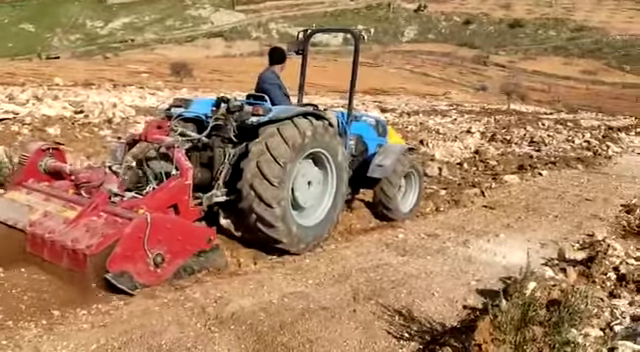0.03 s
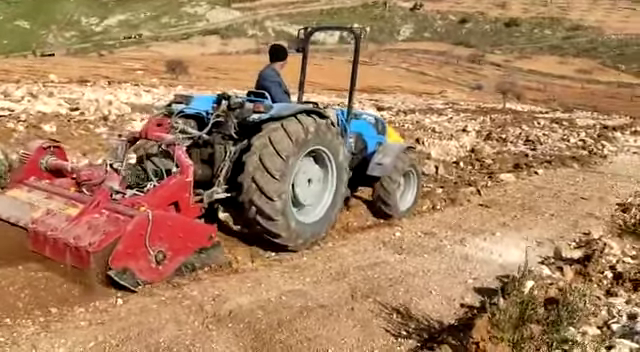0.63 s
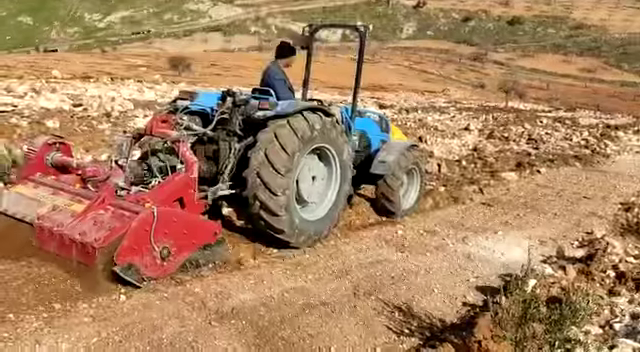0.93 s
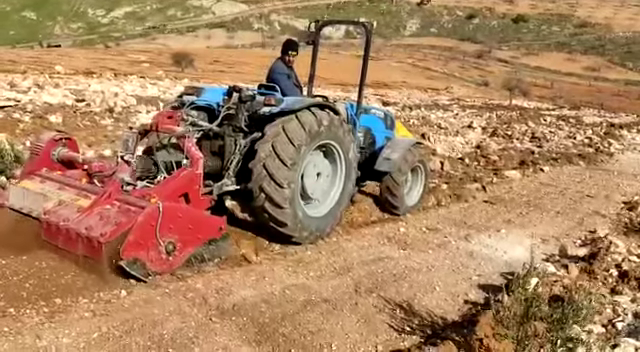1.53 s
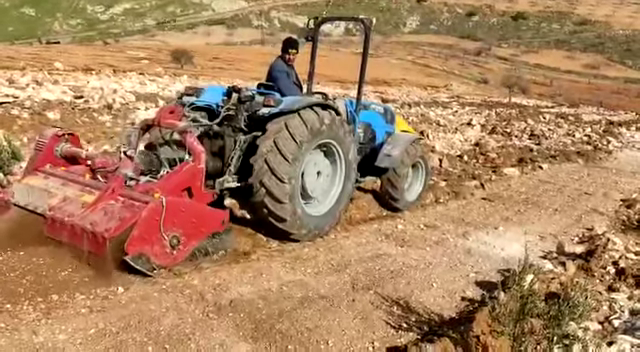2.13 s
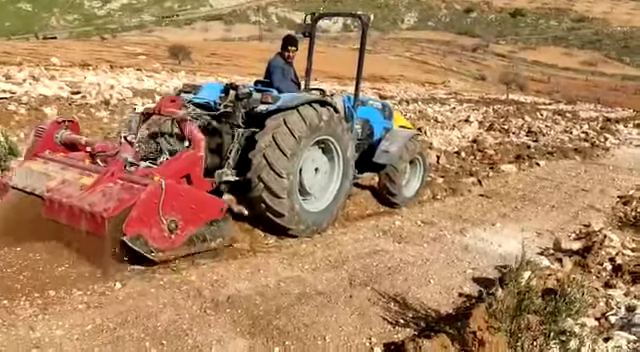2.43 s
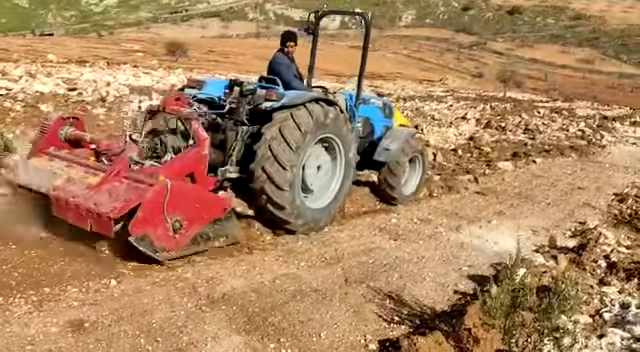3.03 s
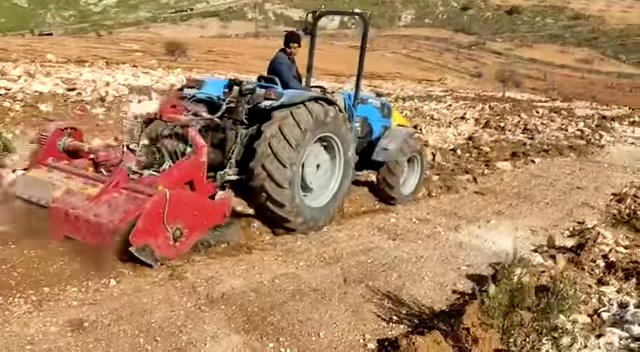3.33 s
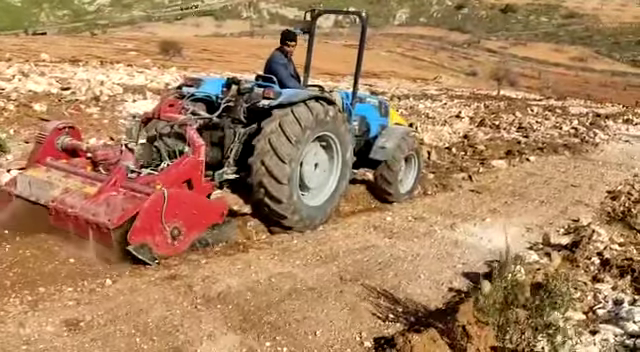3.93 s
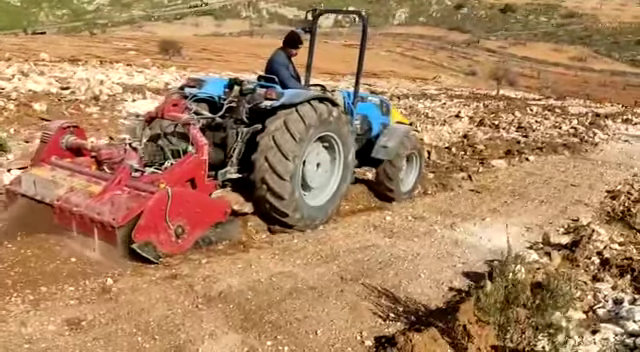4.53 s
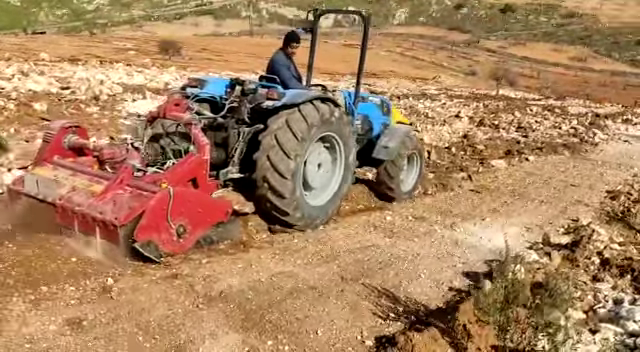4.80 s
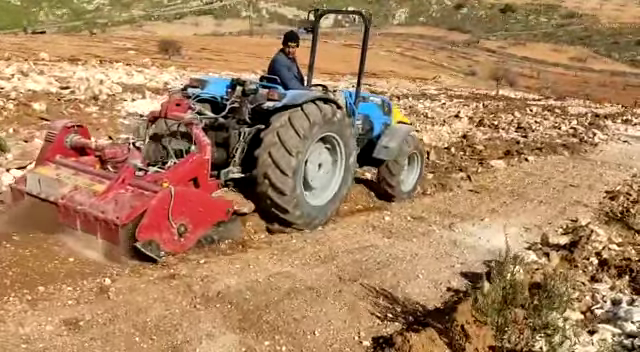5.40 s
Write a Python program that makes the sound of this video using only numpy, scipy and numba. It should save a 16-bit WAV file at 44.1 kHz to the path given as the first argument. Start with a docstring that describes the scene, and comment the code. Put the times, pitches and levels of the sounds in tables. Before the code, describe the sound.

A diesel tractor works a stone crusher outdoors, a few metres from the microphone. From the start, rapid hammering makes a steel hood boom and clatter over the engine's throb, with throaty scraping, a hiss of grit and scattered sharp cracks. Big stones bang repeatedly until they break. Between about 1 and 2 seconds the pounding settles into an even, pulsing drone.

At about 2.2 seconds the crusher lifts: the grinding thins, a few stones still snap, and the engine rises slightly in pitch. The lull is deepest just before 3 seconds. At about 3.1 seconds the crushing returns abruptly with bangs and thuds. The engine sags, lowest around 3.4 seconds, and recovers by 4. From there until the end, near 5.7 seconds, looser stones tumble and rattle irregularly, with low thumps, bright cracks and spraying grit over the steady engine.

```python
"""A diesel tractor drags a stone crusher over a stony field, a few metres away.
At first it feeds steadily: four rows of hammers pound stones against a steel hood, whose modes boom and
clatter while grit sprays inside; big stones are hit once a turn until they break. Soon after 2 s the
crusher is lifted, the load falls and the engine runs free. Just after 3 s it drops back; the engine
sags, recovers by about 4 s and works on through looser stones."""
import sys
import numpy as np
from scipy import signal
from scipy.fft import rfft, irfft, next_fast_len
from scipy.io import wavfile
from scipy.ndimage import uniform_filter1d
from numba import njit

SR = 44100
rng = np.random.default_rng(int(sys.argv[2]) if len(sys.argv) > 2 else 0)


def output_pcm(signal):
    """Save a mono or channel-first signal as 16-bit PCM at the path in sys.argv[1].

    Samples are clipped to [-1, 1] before scaling.
    """
    pcm = np.clip(np.atleast_2d(signal).T, -1, 1) * 32767
    wavfile.write(sys.argv[1], SR, np.round(pcm).astype(np.int16))


N = 249606
TIME = np.arange(N) / SR

# Levels in the tables are relative; each layer has its own further gain.
# load on the rotor against steady work: t/s, level/dB
ROTOR_LOAD = [(0, 1), (.185, -5), (.205, 1), (.6, -2.5), (.74, 5), (1.0, -1.5), (1.3, 2.5), (2.15, -1),
              (2.22, -7.5), (2.55, -6), (2.93, -18.5), (3.06, -12), (3.075, 0), (3.19, 1.5), (3.32, -8.5),
              (3.5, 2), (3.66, -3), (3.82, 1.5), (4.25, 0.5), (5.3, -1), (5.66, 1)]
# stone bed: t/s, evenness (share of the boom that repeats every turn), cavity resonance f/Hz
STONE_BED = [(0, 0.45, 934), (1.0, 0.88, 966), (2.05, 0.91, 968), (2.4, 0.18, 957), (3.15, 0.15, 970),
             (3.6, 0.23, 1045), (4.4, 0, 993), (5.66, 0, 1030)]
# hammer rows: angle/turns, boom level/dB, knock level/dB, grit level/dB
HAMMER_ROWS = [(.18, 0, -.5, -.5), (.37, -1.5, -1.5, .5), (.605, 1, -1, 0), (.86, 0, 2, 0)]
# uneven bite of the rotor: t/s, modulation depth (0-1)
BITE_DEPTH = [(0, .28), (.95, .35), (1.2, .1), (1.65, .12), (1.8, .42), (2.15, .42), (2.4, .05),
              (5.66, .05)]
# big stones: first blow t/s, stay in the rotor t/s, bang level/dB, thud level/dB, chip level/dB
BIG_STONE_HITS = [(.196, .03, -6.5, -11, -19), (.257, .25, -13, -18, -26), (.277, .33, -9.5, -15, -24),
                  (.704, .18, -12, -17, -24), (1.061, .03, -12, -15, -21), (1.132, .54, -11.5, -18, -12.5),
                  (1.624, .03, -11, -10, -17), (1.764, .4, -13, -9, -18), (2.365, .03, -10, -7.5, -17),
                  (2.745, .03, -16, -17, -21), (3.068, .11, -12, -9, -16), (3.169, .03, -16, -6, -18),
                  (3.36, .03, -10, -13, -18), (3.401, .11, -14, -26, -20), (3.485, .03, -13, -7, -20),
                  (3.776, .03, -20, -4, -23), (3.809, .03, -17, -4.5, -20), (3.935, .03, -16, -4, -19),
                  (4.3, .11, -15, -8, -18), (4.452, .03, -24, -8, -26), (4.592, .03, -22, -8, -26),
                  (4.607, .47, -16.5, -18, -16), (4.805, .03, -22, -9, -26), (5.13, .03, -21, -5, -22),
                  (5.278, .03, -21, -7, -22), (5.351, .03, -26, -1.5, -26), (5.475, .03, -15, -22, -21),
                  (5.55, .11, -24, -7, -24)]
# rotor harmonics that drone in the hood: multiple of the turning rate, level/dB
ROTOR_ORDERS = [(8, -4.5), (10, -28), (11, -0.5), (13, -15), (14, -5.5), (15, 5), (16, -19), (17, -21),
                (18, 0.5), (19, -3)]
# low panel modes of the hood: f/Hz, bandwidth/Hz, level/dB
PANEL_MODES = [(106, 86, -11.5), (163.9, 13, 1), (205.6, 35.7, -1), (256, 54.6, -1.5), (316, 73, -9)]
# upper modes of the hood: f/Hz, bandwidth/Hz, level/dB
CLATTER_MODES = [(310, 210, -6.5), (474, 94, 0.5), (559, 47.5, 6.5), (785, 217, -1.5), (781, 36, 0),
                 (1230, 173, -0.5), (2255, 38, -1)]
# modes of the scraped hood wall: f/Hz, bandwidth/Hz, level/dB
WALL_MODES = [(420, 104, -4), (596, 160, 1), (807, 170, -2)]
# spectrum of breaking stone: f/Hz, level/dB
STONE_SPECTRUM = [(500, -4), (1000, -10), (1500, 2.5), (2100, 6.5), (2600, -6), (3800, -4), (5200, -6),
                  (6400, -8.5), (7400, -4), (8300, -5.5), (9100, -11), (10000, -29.5), (13000, -29),
                  (15000, -57)]
# grit spray below and above its crossover: t/s, coarse level/dB, fine level/dB
SPRAY_LEVELS = [(0, 1.5, 0), (.6, -0.5, -1), (.9, 0, -1.5), (1.5, 0.5, 1), (2.1, 1, 0.5), (2.5, -3.5, 1),
                (2.95, -1, 1.5), (3.15, 0.5, 1), (3.85, -2.5, 0), (4.15, -3.5, -0.5), (4.5, -3, -2),
                (4.9, -0.5, 2.5), (5.2, -2.5, 0.5), (5.66, -2, .5)]
# stones that split: t/s, level/dB, ring f/Hz, decay t/s
SPLITS = [(.087, -13, 7000, .005), (.104, -12, 7200, .004), (.884, -11, 3700, .007),
          (1.028, -10, 3700, .006), (1.169, -10, 3900, .005), (1.564, -9, 3900, .004),
          (1.834, -11, 3000, .007), (2.128, -7, 7400, .006), (2.151, -6.5, 3170, .004),
          (2.269, -13, 6400, .018), (2.366, -13.5, 2900, .025), (2.442, -9, 6900, .006),
          (2.61, -2.5, 3900, .0022), (2.744, -14, 3100, .005), (3.067, -12, 3400, .014),
          (3.276, -8.5, 6300, .014), (3.277, -10, 2700, .012), (3.459, -10, 2820, .003),
          (3.501, -8, 3600, .003), (3.517, -6, 2260, .004), (3.575, -10, 7000, .004),
          (3.881, -11, 7300, .005), (4.362, -9, 7300, .005), (4.444, -7, 2300, .013),
          (4.579, -8, 2400, .007), (4.654, -9, 4200, .022), (4.873, -9, 7300, .008),
          (5.314, -6.5, 6550, .004), (5.534, -7, 7440, .003)]
# firing rate of the engine: t/s, f/Hz
FIRING_RATE = [(0.0, 43.9), (0.5, 44.55), (1.0, 44.45), (1.5, 44.28), (2.05, 42.82), (2.4, 43.9),
               (2.85, 47.27), (3.1, 45.9), (3.4, 37.91), (3.8, 42.66), (4.3, 43.48), (5.0, 43.23),
               (5.66, 44.14)]
# exhaust note: t/s, fundamental level/dB, octave level/dB
EXHAUST_LEVELS = [(0.0, -39, -37), (0.05, -40, -43), (0.96, -38, -35), (0.99, -41, -54), (1.26, -36, -27),
                  (1.89, -36, -34), (2.46, -26.5, -26), (2.93, -32, -42), (3.29, -51, -38),
                  (3.8, -23, -26.5), (4.13, -39, -39), (5.66, -28, -28)]
# ground scatter against the direct sound: f/Hz, level/dB
GROUND_SPECTRUM = [(50, -3.5), (300, -10), (600, -17), (1600, -7), (2100, -6), (2800, -1), (4200, 0.5),
                   (6000, 3.5), (14000, 0.5)]
# microphone ports, left minus right: f/Hz, level/dB
PORT_BALANCE = [(60, 5), (230, 4.5), (360, 11.5), (480, 0), (750, 3), (1100, 2.5), (1500, -1), (2100, -1),
                (2500, -13), (3300, -1), (3900, -2), (5500, -1.5), (7200, -12.5), (8600, -1)]

# load laws: level/dB at steady load, slope/(dB per dB of load), level/dB added on an even bed
BOOM_LAW, CLATTER_LAW = (-23.5, 0.81, 2.5), (-23, 1.09, -0.35)
GRIND_LAW, GRIT_LAW = (-34.5, 1.0, 6.9), (-24, 0.76, -5)
FIRINGS_PER_TURN, BITE_TURNS = 3.1685, .85
KNOCK_DB, FRAGMENT_DB = 15.3, -9.5  # against a big stone's bang level
SPRAY_CROSSOVER_HZ, PORT_LAG_S, TOP_HZ = 5300, .00027, 14800


def hood_boom(turns, big):
    """Forced vibration: periodic blows on an even bed make the panels drone; loose stones break the beat."""
    boom_db = work_db(BOOM_LAW)
    evenness = curves(STONE_BED)[0]
    blow_s, _, thud_db, _ = big
    blows = hammer_blows(turns, "boom", scatter_db=0, slip_turns=.00053)
    drone = sum(undb(db + wander(3)) * np.sin(2 * np.pi * (order * turns + rng.random()))
                for order, db in ROTOR_ORDERS)
    beat = unit(unit(drone) + undb(-2.5) * unit(ring(blows, PANEL_MODES)))
    # the beat swells after every blow on a big stone
    pound = uniform_filter1d(fade(impulses(blow_s, np.ones(len(blow_s))), decay_s=.025), size=600)
    beat *= (.87 + .15 * pound) * chug(turns)
    loose = grains(per_s=2000, spread_db=2) * (unit(fade(blows, decay_s=.087)) + .97)
    tumble = undb(-1.3) * unit(ring(loose, PANEL_MODES))
    boom = (np.sqrt(evenness) * beat + np.sqrt(1 - evenness) * tumble) * undb(boom_db)
    # a heavy stone dents the hood for a moment, then leaves the panels ringing
    knocks = impulses(blow_s, undb(thud_db))
    dents = rng.standard_normal(N) * fade(knocks, decay_s=.018)
    thuds = undb(37.5) * ring(knocks, PANEL_MODES) + undb(.5) * ring(dents, [(295, 320, 0)])
    jolts = grains(per_s=550, spread_db=2)
    rumble = unit(colour(jolts, [(20, -14), (35, 10), (65, 19), (130, 12), (250, -29)]))
    return boom + thuds + rumble * undb(boom_db - 12.5) * (1.3 - evenness)


def hood_clatter(turns, big):
    """Impact excitation: hammer knocks, rattling stones and big bangs ring the hood's upper modes."""
    gain = undb(work_db(CLATTER_LAW))
    evenness, cavity_hz = curves(STONE_BED)
    knock_share = np.interp(evenness, [0, 1], [.12, .68])
    blow_s, bang_db, _, _ = big
    blows = hammer_blows(turns, "knock", scatter_db=.9, slip_turns=.004)
    loose = grains(per_s=7000, spread_db=.6) * unit(unit(fade(blows, decay_s=.009)) + .35)
    knocks = unit(delayed(blows, lag_s=.000983))
    rattle = (np.sqrt(knock_share) * knocks + np.sqrt(1 - knock_share) * loose * chug(turns)) * gain
    bangs = impulses(blow_s, undb(bang_db))
    fragments = grains(per_s=10000, spread_db=.5) * fade(bangs, decay_s=.033)
    rattle += undb(KNOCK_DB) * bangs + undb(FRAGMENT_DB) * fragments
    # the cavity between hood and ground rings a little higher as the rotor digs in
    cavity = undb(6.5) * resonator(rattle, cavity_hz, width_hz=94.0)
    # loose stones ring a lightly damped plate of the housing
    plate = ring(loose * gain * (1 - .34 * evenness), [(1080.6, 23.6, 8)])
    steel = ring(rattle, CLATTER_MODES) - cavity - plate
    spectrum = [(100, -12), (300, -4.5), (1250, 1), (1600, -49), (2200, -2.5), (3000, -10.5), (9000, -29)]
    return undb(13.5) * colour(steel, spectrum)


def hood_grind(turns):
    """Friction: each hammer row drags stones along the hood wall in a short, throaty scrape."""
    blows = hammer_blows(turns, "knock", scatter_db=1.5, slip_turns=.002)
    drag = unit(fade(blows, decay_s=.006))
    scrape = grains(per_s=12000, spread_db=.5) * (drag + .35) * chug(turns)
    wall = colour(ring(scrape, WALL_MODES), [(200, -20), (380, 0), (950, 0), (1500, -30)])
    return unit(wall) * undb(work_db(GRIND_LAW))


def grit_spray(turns, big):
    """Shot noise: tiny impacts merge into a hiss that surges at each row; big stones shed bright chips."""
    blow_s, _, _, chip_db = big
    coarse_db, fine_db = curves(SPRAY_LEVELS)
    blows = hammer_blows(turns, "grit", scatter_db=1.2, slip_turns=.008)
    surge = unit(fade(blows, decay_s=.007))
    grit = grains(per_s=40000, spread_db=.1) * unit(surge + 2.1) * undb(work_db(GRIT_LAW) + 2)
    chip_bursts = fade(impulses(blow_s, undb(chip_db - 6)), decay_s=.009)
    chips = grains(per_s=25000, spread_db=.5) * chip_bursts
    coarse = grit * undb(coarse_db) + chips
    fine = grit * undb(fine_db) + chips * undb(2)
    lowpass = signal.butter(4, SPRAY_CROSSOVER_HZ, fs=SR, output="sos")
    return undb(5.5) * colour(fine + signal.sosfiltfilt(lowpass, coarse - fine), STONE_SPECTRUM)


def cracks():
    """Brittle fracture: a stone splits with a bright snap and a crunch that rings at its own pitch."""
    crunch, bursts = grains(per_s=25000, spread_db=.5), np.zeros(N)
    for start_s, level_db, hz, decay_s in SPLITS:
        start = int(start_s * SR)
        span = np.arange(start, min(start + 4096, N))
        burst = undb(level_db) * crunch[span] * np.exp(-TIME[:len(span)] / decay_s)
        ringing = resonator(burst, np.full(len(span), float(hz)), width_hz=.16 * hz)
        bursts[span] += burst + undb(5.5) * ringing
    times, levels_db, _, _ = np.transpose(SPLITS)
    snaps = crunch * fade(impulses(times, undb(levels_db - 25)), decay_s=.004)
    snaps = colour(snaps, [(500, -20), (3000, 0), (9000, -1), (14000, -13)])
    return undb(-4) * colour(bursts, STONE_SPECTRUM) + snaps


def hammer_blows(turns, layer, scatter_db, slip_turns):
    """Quasi-periodic impulse train: each row meets the bed once a turn, a little early or late."""
    blows = np.zeros(N)
    for angle, *levels_db in HAMMER_ROWS:
        db = levels_db[("boom", "knock", "grit").index(layer)]
        force, late = rng.standard_normal(size=(100, 2))[:int(turns[-1]) + 1].T
        times = np.interp(np.arange(len(late)) + angle + slip_turns * late, turns, TIME)
        blows += impulses(times, undb(db + scatter_db * force) * (times < TIME[-1]))
    return blows


def big_blows(turns):
    """Repeated impact: a big stone is hit once a turn. Returns t/s and bang, thud and chip level/dB."""
    rows = []
    for start_s, stay_s, *levels_db in BIG_STONE_HITS:
        first, last = np.interp([start_s, start_s + stay_s], TIME, turns)
        for turn in np.arange(first, last):
            blow_db = np.array(levels_db) + rng.standard_normal()
            rows.append([np.interp(turn, turns, TIME), *blow_db])
    return np.transpose(rows)


def chug(turns):
    """Amplitude modulation: one side of the rotor bites deeper, so the work swells once a turn."""
    return 1 + curves(BITE_DEPTH)[0] * np.cos(2 * np.pi * (turns - BITE_TURNS))


def work_db(law):
    """Power law: a layer's level is linear in the load in dB, with an offset for the bed's evenness."""
    steady_db, slope, even_db = law
    return steady_db + slope * curves(ROTOR_LOAD)[0] + even_db * curves(STONE_BED)[0]


def engine(firings):
    """Harmonic series: exhaust pulses hum; the rush of block, fan and gears throbs with the firings."""
    fundamental_db, octave_db = curves(EXHAUST_LEVELS)
    phase = 2 * np.pi * firings
    hum = undb(fundamental_db + wander(5.45)) * np.sin(phase)
    hum += undb(octave_db + .81 * wander(17)) * np.sin(2 * phase)
    for harmonic in range(3, 9):
        level_db = -46.5 - .67 * (harmonic + 1) + 8.2 * wander(15)
        hum += undb(level_db) * np.sin(harmonic * phase + 2 * np.pi * rng.random())
    throb = (1 + .3 * np.cos(phase)) * rng.standard_normal(N)
    rush = colour(throb, [(25, -21), (70, -2), (200, 2.5), (350, -15), (470, 3), (1000, -4),
                          (2000, -4.5), (5000, -49), (7800, -27), (10000, -55), (15000, -64)])
    return hum + undb(-27.5) * unit(rush)


def ground_scatter(x):
    """Multipath: stones strike all along the rotor, so paths over rough ground keep trading their share."""
    rough = colour(x, GROUND_SPECTRUM)
    lags_s = rng.uniform(.0003, .005, size=16)
    shares = np.array([wander(60) for _ in lags_s])
    shares /= np.linalg.norm(shares, axis=0)
    return sum(share * delayed(rough, lag_s) for share, lag_s in zip(shares, lags_s))


def breeze():
    """Pressure fluctuation: light air flutters at one microphone port."""
    spectrum = [(10, -9), (25, -4), (60, -44), (150, 1), (1000, -68), (10000, -90)]
    return undb(-36 + 2.6 * wander(9.1)) * unit(colour(rng.standard_normal(N), spectrum))


def undb(db):
    """Level to amplitude ratio."""
    return 10 ** (np.asarray(db) / 20)


def unit(x):
    """Normalisation to rms 1."""
    return x / np.sqrt(np.mean(x ** 2))


def curves(table):
    """Linear interpolation of each column through time."""
    times, *columns = np.transpose(table)
    return [np.interp(TIME, times, column) for column in columns]


def colour(x, points, power=1):
    """Zero-phase filtering by a spectrum (f/Hz, level/dB) raised to a power."""
    hz, db = np.transpose(points)
    size = next_fast_len(N + 4096)
    bins = np.maximum(np.fft.rfftfreq(size, 1 / SR), 1)
    gain = undb(power * np.interp(np.log(bins), np.log(hz), db))
    return irfft(rfft(x, size) * gain, size)[:N]


@njit
def resonator(x, hz, width_hz):
    """Second-order resonance whose centre may move; gain 1 at the centre."""
    y, band_state, low_state = np.empty(len(x)), 0., 0.
    for i in range(len(x)):
        step, damping = np.tan(np.pi * hz[i] / SR), width_hz / hz[i]
        band = (band_state + step * (x[i] - low_state)) / (1 + step * (step + damping))
        band_state = 2 * band - band_state
        low_state += 2 * step * band
        y[i] = damping * band
    return y


def ring(x, modes):
    """Superposition of modes (f/Hz, bandwidth/Hz, level/dB); neighbours swing opposite ways."""
    return sum((-1) ** k * undb(db) * resonator(x, np.full(N, float(hz)), float(width))
               for k, (hz, width, db) in enumerate(modes))


def impulses(times, sizes):
    """Ideal impacts: one impulse at each time."""
    return np.bincount(np.clip(np.asarray(times) * SR, 0, N - 1).astype(int), sizes, N)


def fade(kicks, decay_s):
    """Exponential decay after each impulse."""
    return signal.lfilter([1], [1, -np.exp(-1 / (decay_s * SR))], kicks)


def grains(per_s, spread_db):
    """Shot noise: a hail of tiny collisions of unequal size; rms 1."""
    hits = rng.random(N) < per_s / SR
    size = np.minimum(rng.exponential(size=N), 4)
    sign = np.sign(rng.standard_normal(N))
    return unit(hits * sign * undb(spread_db * size))


def wander(per_s):
    """Smooth random fluctuation; rms 1."""
    hold = int(SR / per_s)
    steps = np.repeat(rng.standard_normal(N // hold + 1), hold)[:N]
    return unit(uniform_filter1d(steps, hold))


def delayed(x, lag_s):
    """Pure delay, to the nearest sample."""
    return np.interp(np.arange(N) - np.round(lag_s * SR), np.arange(N), x, left=0)


def scene():
    """Superposition: the engine and the rotor geared to it reach the right port first, then the left."""
    firings = np.cumsum(curves(FIRING_RATE)[0]) / SR
    turns = firings / FIRINGS_PER_TURN
    big = big_blows(turns)
    tractor = engine(firings)
    hood = hood_boom(turns, big) + hood_grind(turns) + hood_clatter(turns, big)
    crusher = hood + grit_spray(turns, big) + cracks()
    return np.array([delayed(tractor + crusher, lag_s) + ground_scatter(crusher) + breeze()
                     for lag_s in (PORT_LAG_S, 0)])


def record(dry):
    """Transduction: each port colours the sound, saturation rounds the peaks, a low-pass cuts the top."""
    left = colour(dry[0], PORT_BALANCE, power=1 / 2)
    right = colour(dry[1], PORT_BALANCE, power=-1 / 2)
    lowpass = signal.ellip(12, .2, 90, TOP_HZ, fs=SR, output="sos")
    return signal.sosfilt(lowpass, np.tanh([left, right]))


dry = scene()
out = record(dry)
output_pcm(out)
```